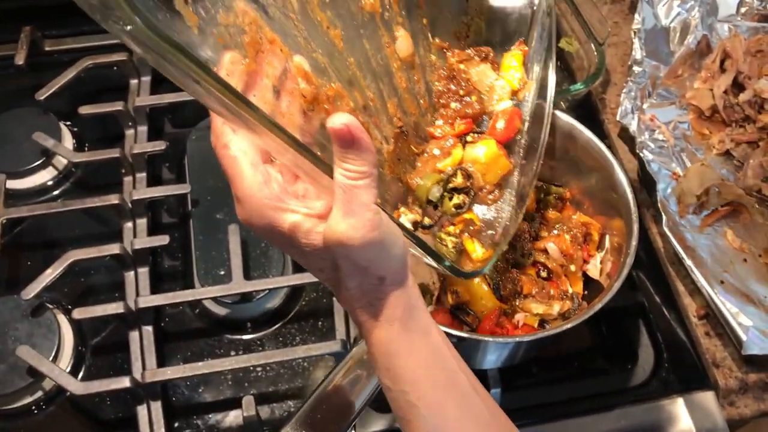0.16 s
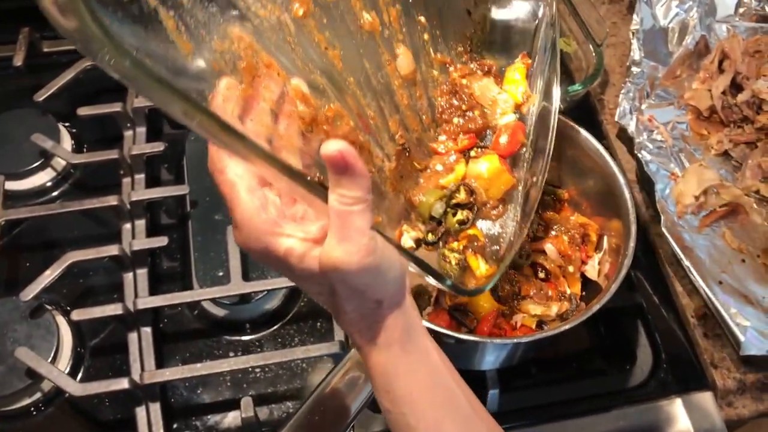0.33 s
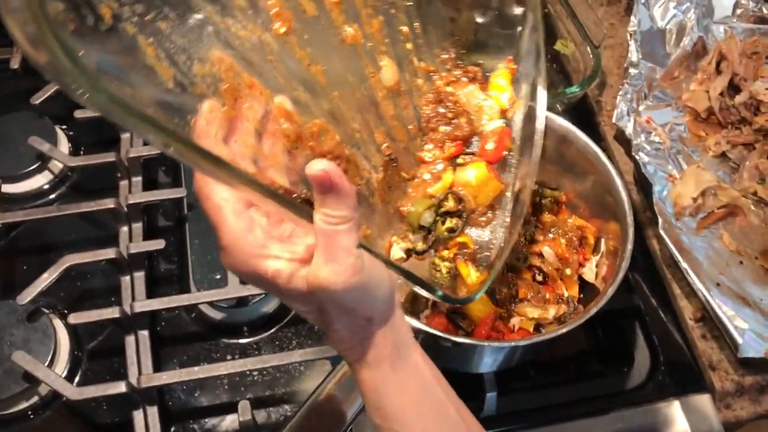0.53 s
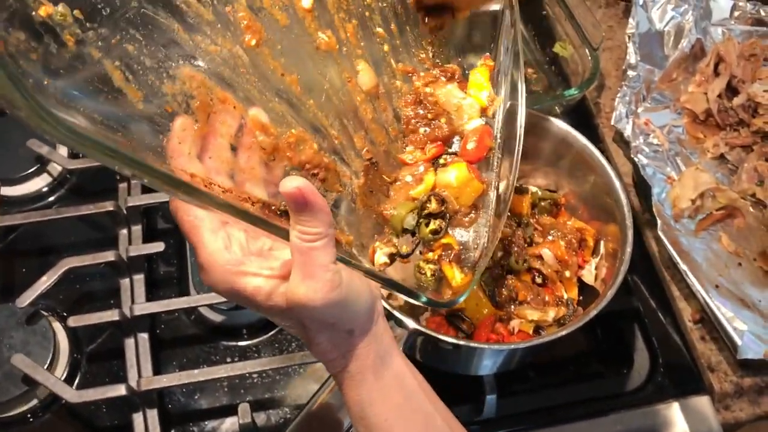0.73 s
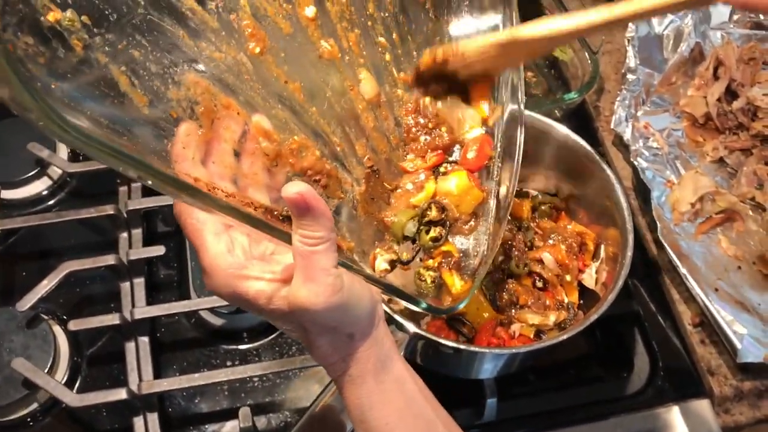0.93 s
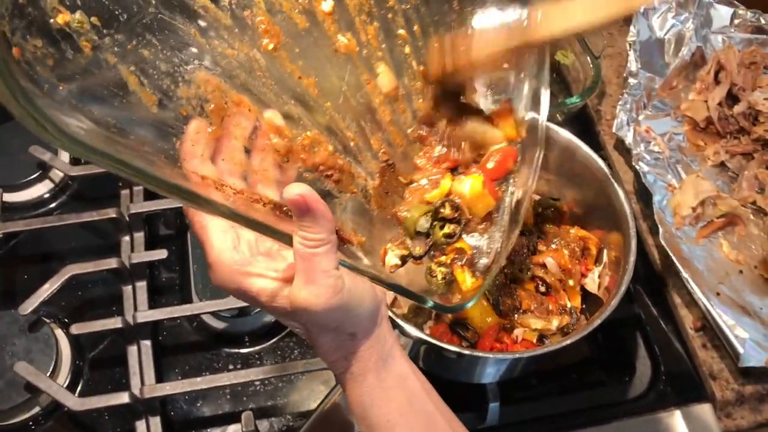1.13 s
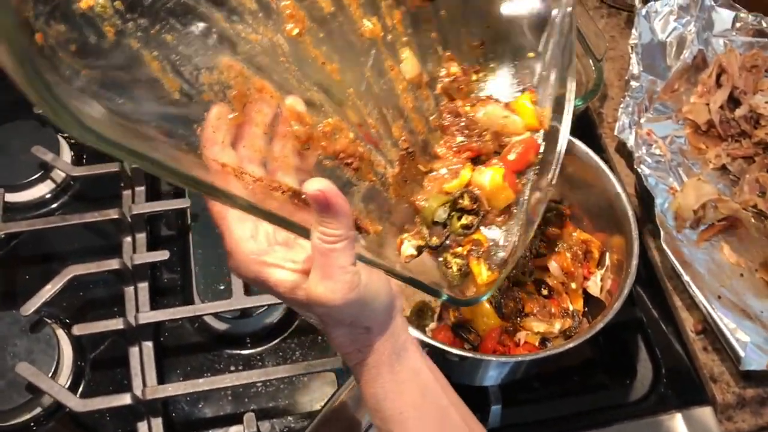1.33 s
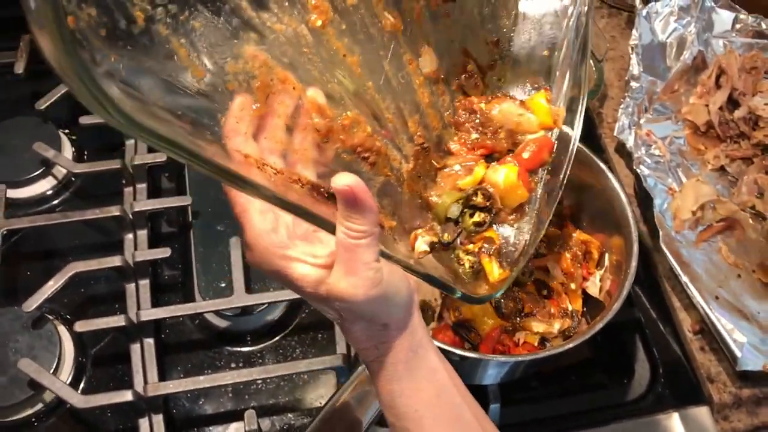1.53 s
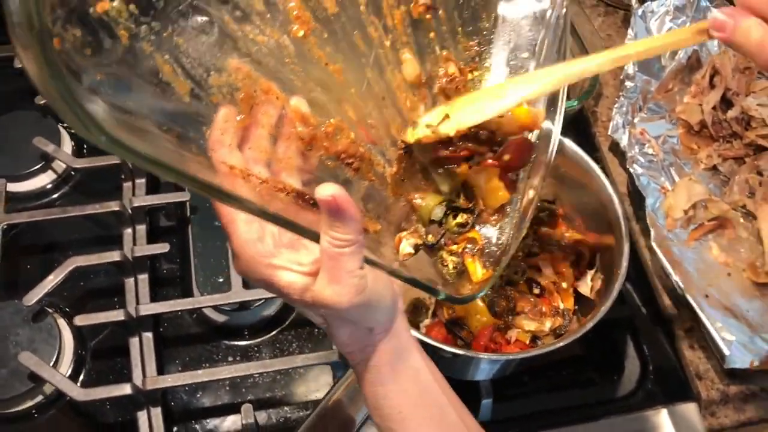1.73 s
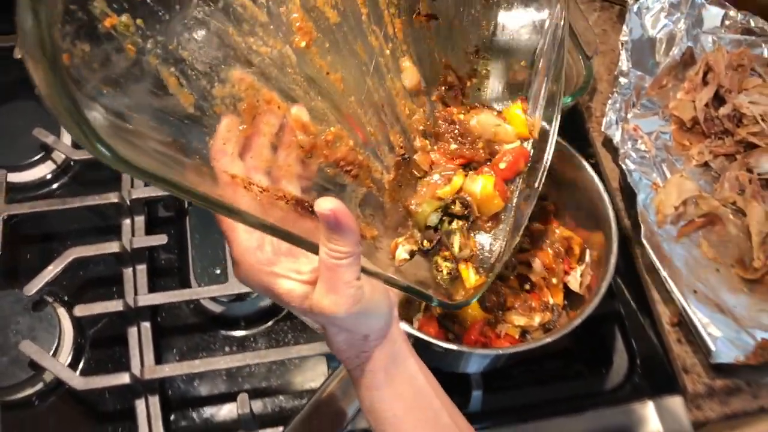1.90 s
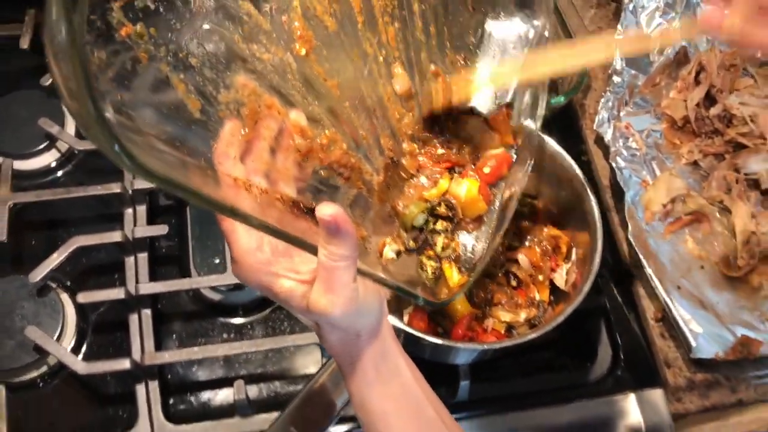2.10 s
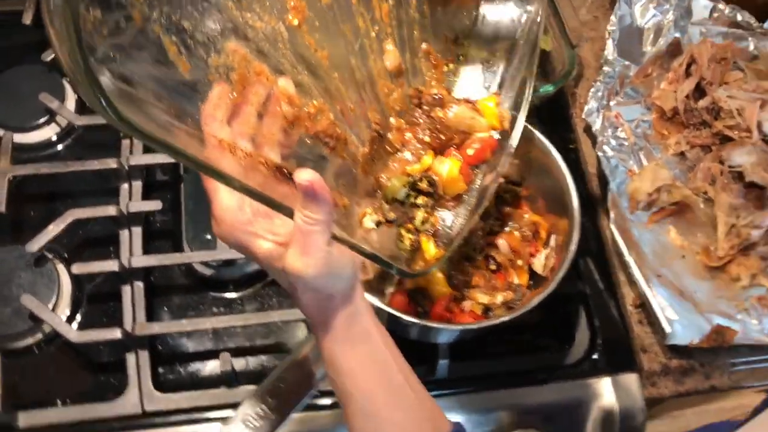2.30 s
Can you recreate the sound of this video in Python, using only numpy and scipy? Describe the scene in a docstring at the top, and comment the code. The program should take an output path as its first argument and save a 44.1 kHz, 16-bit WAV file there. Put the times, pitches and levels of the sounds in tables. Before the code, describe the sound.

Wooden spoon knocks and scrapes wet roasted vegetables out of a glass dish, squelching and popping

```python
"""Wet roasted vegetables are pushed out of a hand-held glass dish with a wooden spoon, in a quiet humming kitchen.
A wet pop comes first, then two almost joined hard knocks, which excite the damped modes of the glass. Scrapes
follow (random micro-slips drive the same modes) among squelches (dense wet crackle) and cavity pops, which crowd
together after one second. Further knocks and slow scrapes come next, then a last knock, scrapes, squelches and pops.
Feedback delays add the echo of the kitchen; steady coloured noise is its hum. Close mono microphone."""
import sys
import numpy as np
from scipy import signal
from scipy.io import wavfile

SR = 44100
rng = np.random.default_rng(int(sys.argv[2]) if len(sys.argv) > 2 else 0)


def digitize_waveform(pressure):
    """Quantize a signal to 16-bit integers and store it at the path in sys.argv[1].

    Rows of a 2-D input are taken as channels; values are limited to [-1, 1].
    """
    field = np.atleast_2d(pressure).T
    bounded = np.clip(field, -1, 1)
    quanta = np.round(bounded * 32767).astype(np.int16)
    wavfile.write(sys.argv[1], SR, quanta)


def nominal_scale(level):
    """Amplitude ratio for a level in decibels (scalar or array-like)."""
    x = np.asarray(level, float) / 20
    return 10 ** x


N = 103635

# spectrum of the kitchen hum, relative: frequency_hz, density_db (per Hz)
HUM_SPECTRUM = [(20, -19), (35, -12), (50, 2), (80, -7), (130, -11), (250, -11.5), (500, -14), (1000, -15),
                (2000, -24.5), (4000, -29), (7000, -30.5), (10000, -34.5), (13000, -30.5), (16000, -29.5)]
HUM_RMS_DB = -69
ECHO_T60_S, ECHO_DB, ECHO_CUT_HZ = 0.54, -29, 13000

# spectrum of the wet crackle, relative: frequency_hz, density_db (per Hz)
WET_SPECTRUM = [(2000, -23.5), (3500, -4.5), (5000, -2.5), (7300, 6.5), (9000, 6.5), (10300, -21),
                (12500, -5.5), (15500, -12.5)]
# sauce squeezed and food peeling off: peak_flow_s, rise_s, fall_s, level_db, brightness_db
SQUELCHES = [(.005, 0.0072, 0.01, -60.5, 4.5), (0.317, .005, 0.0044, -45, 2),
             (0.399, 0.0066, .025, -52, 1.5), (0.4807, 0.0011, 0.0073, -42, 5),
             (0.495, 0.0072, 0.0088, -45.5, 1.5), (0.546, 0.013, 0.031, -51.5, 1.5),
             (.605, 0.008, 0.017, -54, 1.5), (0.657, 0.014, 0.025, -54.5, 3.5),
             (.762, 0.005, 0.0094, -44, 1), (0.936, 0.015, 0.018, -49.5, 1.5),
             (1.0, 0.0053, 0.012, -55, 1.5), (1.018, 0.0025, 0.009, -41.5, 1.5),
             (1.076, 0.0076, 0.014, -64.5, -6.5), (1.106, 0.037, 0.016, -58, 0.5),
             (1.145, 0.022, 0.01, -64, 5), (1.19, 0.0034, 0.011, -60.5, 5), (1.23, .008, 0.023, -61, 2),
             (1.67, 0.049, 0.026, -56, 1.5), (1.79, 0.01, 0.018, -60, 1), (2.185, 0.048, 0.033, -60.5, 2),
             (2.235, 0.0039, 0.0036, -54, 1), (2.289, 0.0029, 0.0069, -51, 1)]
WET_GRAINS_PER_S, WET_SPREAD_DB, BRIGHT_SPLIT_HZ = 2500, 3.5, 9000

# sticky food letting go: start_s, level_db (before POP_GAIN_DB), pitch_hz
POPS = [(0.0044, -47, 10830), (0.398, -59, 8800), (0.5379, -46, 14100), (0.5432, -50, 14300),
        (0.57, -65, 5780), (0.595, -54, 6170), (0.634, -47.5, 5050), (0.6528, -48.5, 11800),
        (0.6671, -50, 4690), (0.7346, -63, 4500), (0.7854, -47.5, 14600), (0.84, -59.5, 11700),
        (0.9337, -46.5, 3430), (0.9663, -58, 3940), (0.994, -57, 13100), (1.0054, -53.5, 7800),
        (1.0141, -51, 13200), (1.0227, -50.5, 4000), (1.0454, -57, 12800), (1.0581, -58, 5740),
        (1.0706, -50.5, 5800), (1.074, -48, 5520), (1.0774, -47.5, 5940), (1.1068, -47.5, 5630),
        (1.124, -45, 12400), (1.1285, -53, 8750), (1.1397, -57, 8040), (1.1494, -51, 13800),
        (1.1874, -47, 14100), (1.2004, -51, 6900), (1.2226, -52, 9200), (1.2266, -50, 11000),
        (1.239, -56.5, 4840), (1.2486, -52, 15500), (1.287, -71, 3750), (1.9212, -61.5, 11300),
        (2.1775, -49.5, 15200), (2.1924, -49, 4000), (2.1954, -46, 7160), (2.2224, -47, 12400),
        (2.2334, -67.5, 4370), (2.282, -45, 5350), (2.2865, -53, 4160), (2.2927, -49.5, 6900),
        (2.2996, -44.5, 15000)]
POP_T60_CYCLES, POP_SNAP_DB, POP_GAIN_DB = 22.5, -21, 5

# modes of the glass dish, damped by hand and food:
# pitch_hz, level_db, t60_s (when struck), family (0 rim, 1 bottom, 2 wall)
DISH_MODES = [(246.4, -30, 0.28, 1), (347, -22.5, 0.036, 1), (502.5, -30.5, 0.21, 1), (604, -22, 0.098, 1),
              (728.8, -17.5, 0.17, 1), (818, -10.5, 0.024, 1), (759, -21.5, 0.26, 1), (1034, -3, 0.14, 0),
              (1086, -12.5, 0.022, 0), (1032, -19.5, 0.66, 0), (1154, -18, 0.036, 1), (1500, -19, 0.17, 2),
              (1539, -10.5, 0.084, 2), (1553, -25.5, 0.38, 2), (1625, -17, 0.15, 1), (1700, -31, 0.11, 1),
              (2148, -19.5, .1, 1), (2270, -18, 0.15, 2), (2785, -22, .12, 1), (2982, -17.5, 0.061, 1),
              (3360, -30.5, 0.071, 2), (3705, -25, 0.059, 1), (4345, -18, 0.07, 1), (5530, -17, 0.045, 1),
              (6410, -14.5, 0.021, 1)]

# spectrum of the dry rub, relative: frequency_hz, density_db (per Hz)
RUB_SPECTRUM = [(150, -9), (300, 1.5), (700, 1.5), (1100, 0.5), (1500, 0), (2200, -1), (3000, -14.5),
                (4400, -6), (6500, -18), (10000, -18), (15500, -24)]
# spoon edge dragged over the glass: peak_pressure_s, rise_s, fall_s, level_db, rumble_db (added to level_db)
SCRAPES = [(0.316, 0.011, .01, -55, 10), (0.409, 0.037, 0.03, -62.5, -11), (.49, .006, 0.013, -55.5, -5),
           (.56, 0.048, 0.04, -67.5, 8), (.61, 0.013, 0.014, -61, -15), (0.667, 0.028, 0.026, -54.5, 6.5),
           (0.763, 0.0083, 0.0055, -51.5, 2), (0.916, 0.0018, 0.011, -53, 0),
           (.938, 0.0071, 0.0059, -48.5, 6.5), (.968, 0.0041, 0.0091, -60, -7),
           (1.021, 0.011, 0.0078, -55.5, -4), (1.09, 0.031, 0.015, -65, -9),
           (1.408, 0.0035, 0.0086, -70, 7), (1.663, 0.025, 0.034, -50, -5), (1.698, 0.027, 0.054, -58, -5),
           (1.781, 0.016, 0.0091, -61, -15), (1.804, 0.017, 0.0088, -57.5, 1),
           (2.141, 0.028, 0.034, -56, 7.5), (2.183, 0.026, 0.031, -61, -20)]
SLIPS_PER_S, SLIP_SPREAD_DB, RUMBLE_SPLIT_HZ = 4500, 3, 434
SCRAPE_RING_DB, SCRAPE_BOTTOM_DB, SCRAPE_WALL_DB = -34, 8, 11
SCRAPE_T60_FACTOR = 0.54  # the dragged spoon shortens the ringing
SCRAPE_EVENNESS = 0.46  # factor on mode levels in dB: weak modes are excited almost as much as strong ones

# spoon knocks on the glass: start_s, level_db, bottom_modes_db, wall_modes_db, contact_hardness_hz
KNOCKS = [(0.231, -29.5, 5.5, -26, 2320), (.234, -23, -11, 5, 1680), (0.665, -50, -11, -10, 1400),
          (0.691, -49, -10, -7, 1360), (.755, -63, 21, 13, 4100), (0.766, -44, -16, -8, 1500),
          (0.916, -66.5, 22, 7, 4020), (.933, -57, 11, -2, 6950), (1.496, -37, 5, -3, 7300),
          (1.499, -44, 1, -12, 3440), (1.799, -46, -13, -13, 1400), (2.0676, -36, 14.5, -4, 1720),
          (2.0705, -43.5, 11, 7, 1850), (2.068, -58.5, -10, 10, 13300), (.2298, -55, 12, 3, 12900),
          (1.4966, -54, -20, -4, 15900)]
CRACK_DB, CRACK_DECAY_S, TAIL_DB, TAIL_DECAY_S = 6, 0.002, -12, 0.024
# dull push of wood and hand
THUD_DB, THUD_HZ, THUD_T60_S = -5.5, 357.5, 0.0175
KNOCK_LOW_CUT_HZ = 163


def rms_one(x):
    """Normalization: scales a signal to unit root-mean-square value."""
    return x / np.sqrt(np.mean(x ** 2) + 1e-20)


def drift(rate_hz):
    """Low-pass filtered noise: a slow random wander of unit spread."""
    step = 40  # samples between computed points
    pole = np.exp(-2 * np.pi * rate_hz * step / SR)
    noise = rng.standard_normal(N // step + 2002)
    slow = signal.lfilter([1], [1, -2 * pole, pole * pole], noise)[2000:]  # settled part
    return np.interp(np.arange(N) / step, np.arange(len(slow)), rms_one(slow))


def ring(push, hz, t60_s):
    """Damped resonance: a unit impulse sets a decaying sine of initial height 1 ringing."""
    radius = nominal_scale(-60 / (t60_s * SR))
    angle = 2 * np.pi * hz / SR
    poles = [1, -2 * radius * np.cos(angle), radius * radius]
    return signal.lfilter([0, np.sin(angle)], poles, push + 1e-18)


def soften(x, hz):
    """Contact duration: a softer, longer contact loses its treble steeply."""
    return signal.sosfilt(signal.butter(4, hz, fs=SR, output="sos"), x)


def split(x, hz):
    """Crossover: the parts below and above a corner frequency."""
    low = signal.sosfilt(signal.butter(2, hz, fs=SR, output="sos"), x)
    high = signal.sosfilt(signal.butter(2, hz, "high", fs=SR, output="sos"), x)
    return low, high


def swell(peak_s, rise_s, fall_s, db):
    """Exponential growth and decay: an envelope rising to a peak, then falling."""
    t = np.arange(N) / SR - peak_s
    return nominal_scale(db) * np.exp(np.where(t < 0, t / rise_s, -t / fall_s))


def grit(per_s, spread_db):
    """Poisson-like impulse noise: dense random grains of uneven size and sign, in two sources."""
    size_db = spread_db * np.minimum(rng.exponential(1, (2, N)), 5)
    signs = rng.choice([-1, 1], (2, N))
    present = rng.random((2, N)) < per_s / SR
    return nominal_scale(size_db) * signs * present


def coloured(sources, spectrum, patchy_db, flicker_hz):
    """Subtractive filtering: third-octave bands of two sources in turn, each flickering; unit rms."""
    hz, db = np.transpose(spectrum)
    edges = 18 * 2 ** np.arange(0, 10.1, 1 / 3)
    out = 0
    for k, (low, high) in enumerate(zip(edges, edges[1:])):
        mid = np.sqrt(low * high)
        if 0.8 * hz[0] < mid < 1.1 * hz[-1]:
            band_filter = signal.butter(2, [low, high], "band", fs=SR, output="sos")
            band = signal.sosfilt(band_filter, sources[k % 2])
            level_db = np.interp(np.log(mid), np.log(hz), db) + patchy_db * drift(flicker_hz)
            out = out + nominal_scale(level_db) * band
    return rms_one(out)


def hum():
    """Stationary noise: the steady coloured background of the kitchen."""
    noise = rng.standard_normal((2, N))
    return nominal_scale(HUM_RMS_DB) * coloured(noise, HUM_SPECTRUM, patchy_db=0.5, flicker_hz=1.7)


def kitchen_echo(near):
    """Reverberation: eight feedback delays, weaker and duller on every round."""
    out = np.zeros(N)
    dull = np.exp(-2 * np.pi * ECHO_CUT_HZ / SR)
    for k, lag in enumerate((np.geomspace(0.009, 0.031, 8) * SR).astype(int)):
        loop = near.copy()
        gain = nominal_scale(-60 * lag / SR / ECHO_T60_S)
        state = [0.]
        for i in range(lag, N, lag):
            back, state = signal.lfilter([gain * (1 - dull)], [1, -dull], loop[i - lag:i], zi=state)
            loop[i:i + lag] += back[:N - i]
        out += (loop - near) * (-1) ** k  # echoes alone
    return nominal_scale(ECHO_DB) * out


def squelching():
    """Granular wet noise: dense crackle swells with the flow, duller or brighter with each squeeze."""
    grains = grit(WET_GRAINS_PER_S, WET_SPREAD_DB)
    crackle = coloured(grains, WET_SPECTRUM, patchy_db=2.5, flicker_hz=40)
    low, high = split(crackle, BRIGHT_SPLIT_HZ)
    out = np.zeros(N)
    for peak_s, rise_s, fall_s, db, bright_db in SQUELCHES:
        tilted = nominal_scale(-bright_db) * low + nominal_scale(bright_db) * high
        out += swell(peak_s, rise_s, fall_s, db) * tilted
    return out


def pops():
    """Cavity resonance: a puff of noise rings a tiny cavity a few cycles, with a broad snap on top."""
    out, length = np.zeros(N + SR), 600
    t = np.arange(length) / SR
    for start_s, db, hz in POPS:
        puff = rng.standard_normal(length) * np.exp(-t / 0.00038)
        cavity = ring(puff, hz, POP_T60_CYCLES / hz)
        snap = nominal_scale(POP_SNAP_DB) * np.gradient(puff)
        i = int(start_s * SR)
        out[i:i + length] += nominal_scale(db + POP_GAIN_DB) * (cavity / np.abs(cavity).max() + snap)
    return out[:N]


def dish(push, bottom_db, wall_db, t60_factor=1, evenness=1):
    """Modal superposition: all modes of the glass, their families weighted by where it is touched."""
    out = 0
    for k, (hz, db, t60_s, family) in enumerate(DISH_MODES):
        family_db = (0, bottom_db, wall_db)[round(family)]
        mode = ring(push, hz, t60_s * t60_factor)
        out = out + nominal_scale(db * evenness + family_db) * mode * (-1) ** k
    return out


def scraping():
    """Stick-slip friction: micro-slips under the spoon make a dry rub and set the dish ringing."""
    slips = grit(SLIPS_PER_S, SLIP_SPREAD_DB)
    rub = coloured(slips, RUB_SPECTRUM, patchy_db=5.0, flicker_hz=28.3)
    low, high = split(rub, RUMBLE_SPLIT_HZ)
    pressure, weight = np.zeros(N), np.zeros(N)
    for peak_s, rise_s, fall_s, db, rumble_db in SCRAPES:
        pressure += swell(peak_s, rise_s, fall_s, db)
        weight += swell(peak_s, rise_s, fall_s, db + rumble_db)
    push = pressure * rms_one(slips[0])
    ringing = dish(push, SCRAPE_BOTTOM_DB, SCRAPE_WALL_DB, SCRAPE_T60_FACTOR, SCRAPE_EVENNESS)
    return pressure * high + weight * low + nominal_scale(SCRAPE_RING_DB) * ringing


def knocks():
    """Impact excitation: a soft contact strikes the dish modes, with thud, crack and short hissing tail."""
    out, length = np.zeros(N + SR), SR // 2
    t = np.arange(length) / SR
    decay = nominal_scale(CRACK_DB) * np.exp(-t / CRACK_DECAY_S) + nominal_scale(TAIL_DB) * np.exp(-t / TAIL_DECAY_S)
    for start_s, db, bottom_db, wall_db, contact_hz in KNOCKS:
        hit = soften(1. * (t == 0), contact_hz)
        thud = nominal_scale(THUD_DB + bottom_db) * ring(hit, THUD_HZ, THUD_T60_S)
        noise = soften(rng.standard_normal(length), contact_hz) * decay
        i = int(start_s * SR)
        out[i:i + length] += nominal_scale(db) * (dish(hit, bottom_db, wall_db) + thud + noise)
    _, above = split(out[:N], KNOCK_LOW_CUT_HZ)
    return above


def scene():
    """Linear superposition: dish, spoon and food close by, their echo, and the background hum."""
    near = squelching() + pops() + scraping() + knocks()
    return (near + kitchen_echo(near) + hum())[None]


def band_limit(x):
    """A steep low-pass at the top of the band."""
    return signal.sosfilt(signal.butter(12, 16660, fs=SR, output="sos"), x)


def record(dry):
    """Band limitation: the top of the band is shelved down by 26 dB or more from 15.6 kHz up."""
    shelf = signal.cheby2(12, 26, 15600, fs=SR, output="sos")
    mix = signal.sosfilt(shelf, dry)
    return band_limit(mix)


dry = scene()
out = record(dry)
digitize_waveform(out)
```